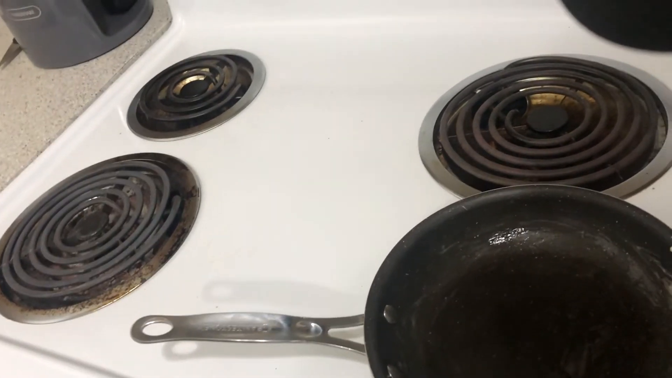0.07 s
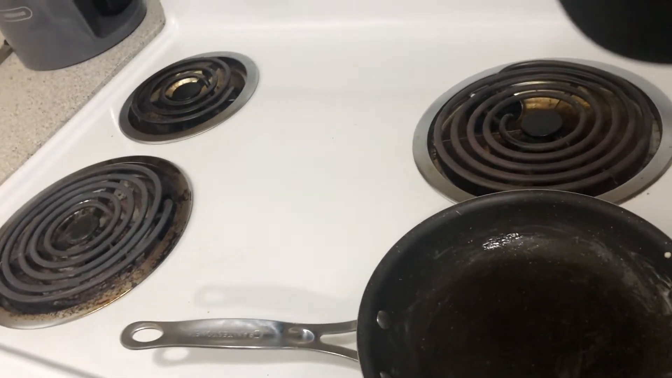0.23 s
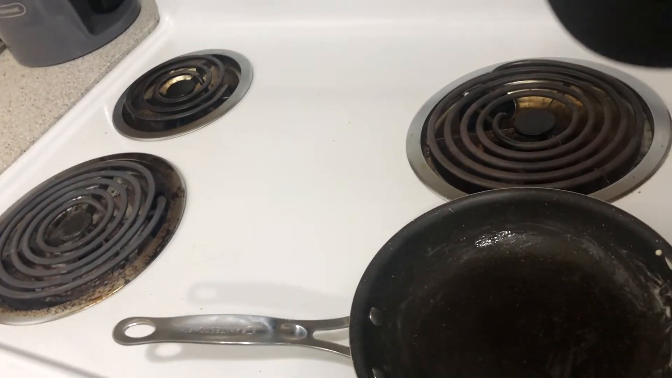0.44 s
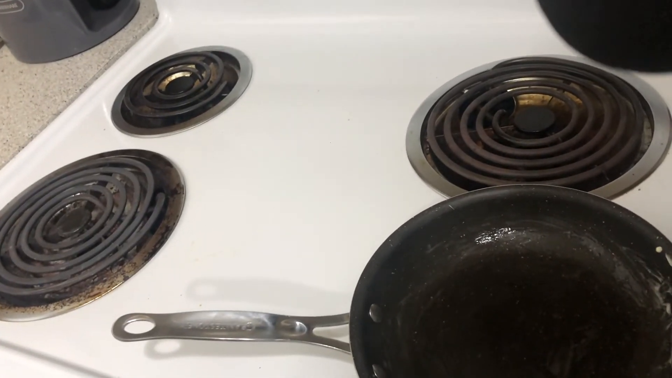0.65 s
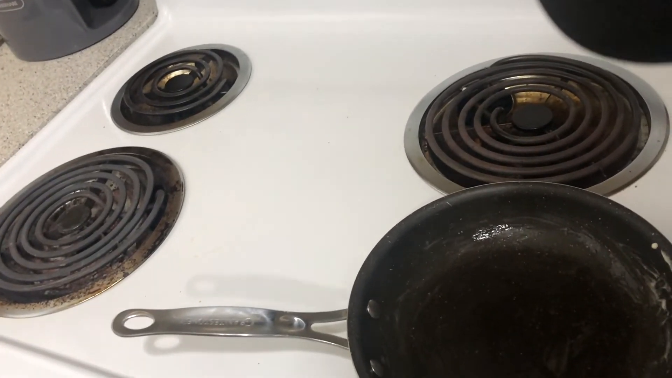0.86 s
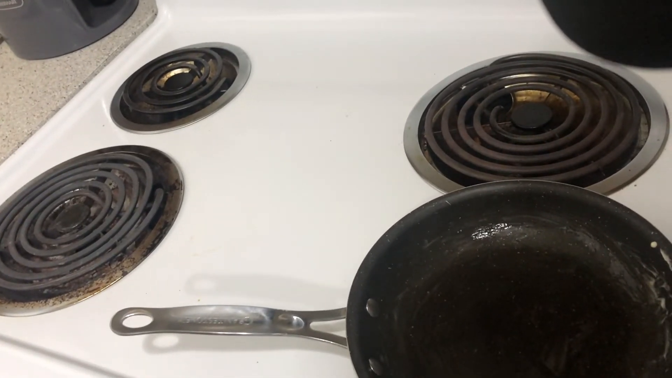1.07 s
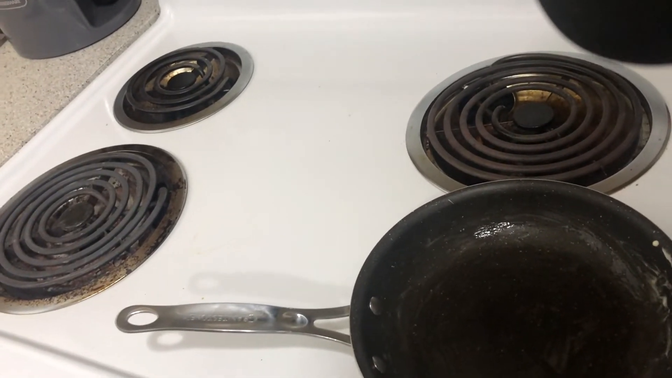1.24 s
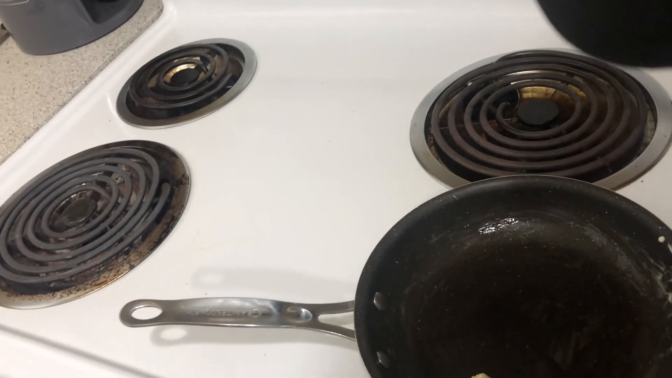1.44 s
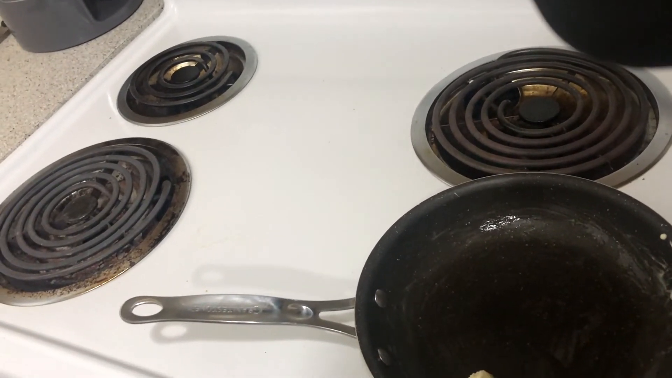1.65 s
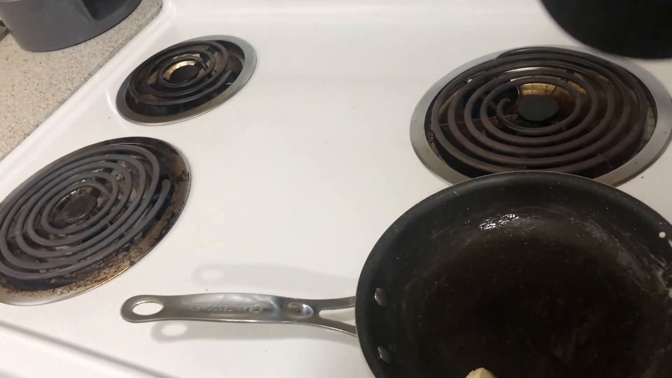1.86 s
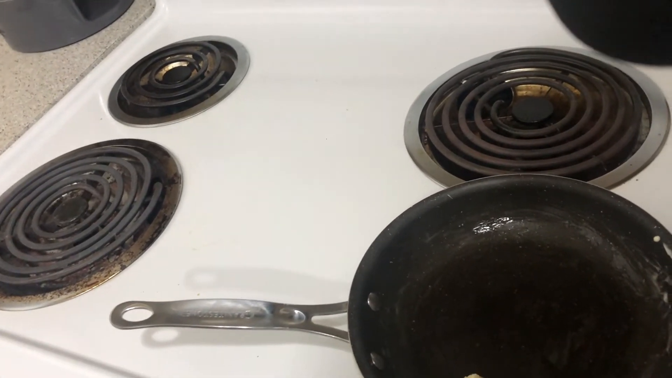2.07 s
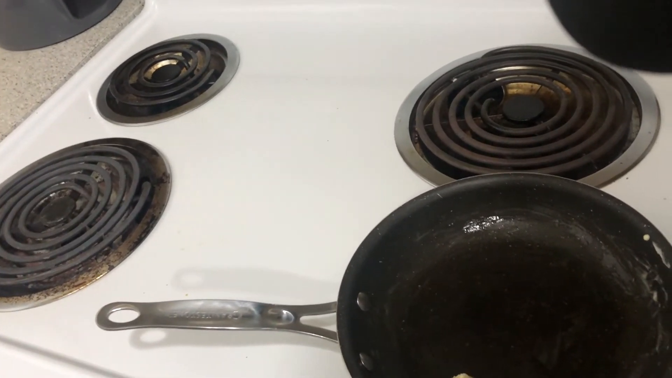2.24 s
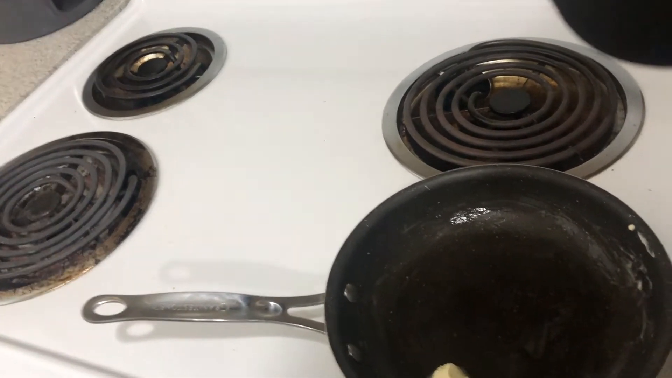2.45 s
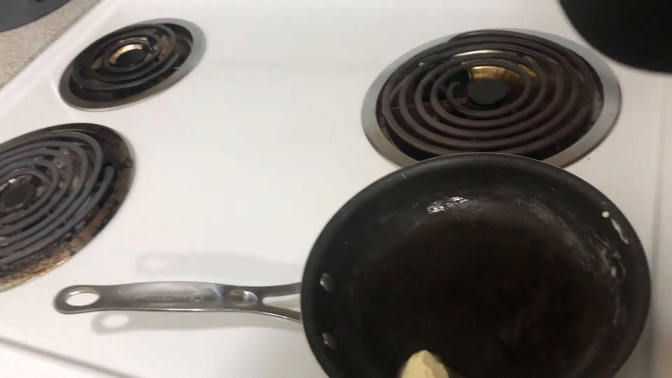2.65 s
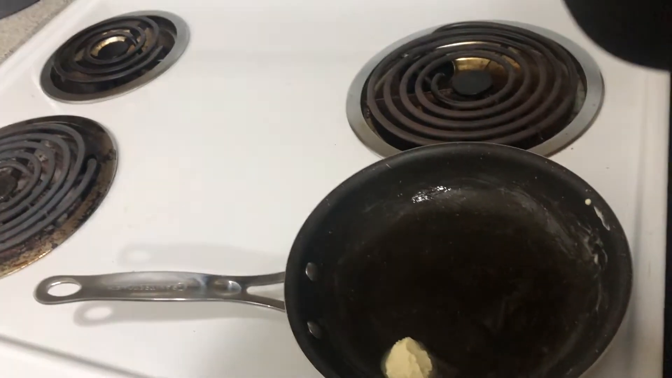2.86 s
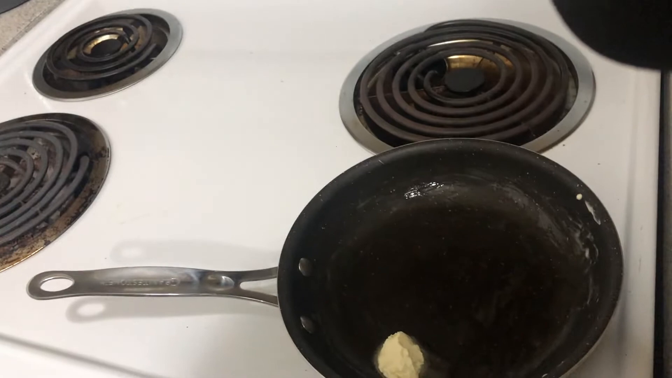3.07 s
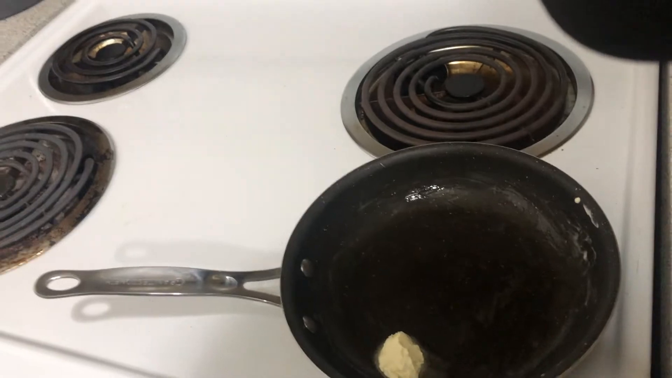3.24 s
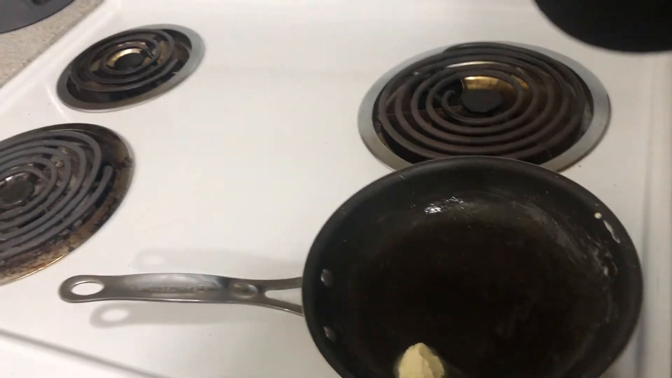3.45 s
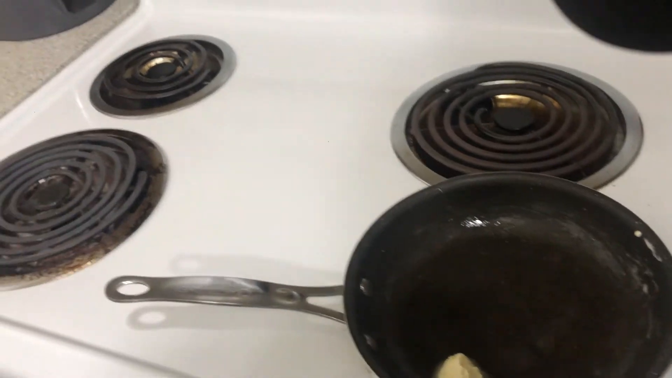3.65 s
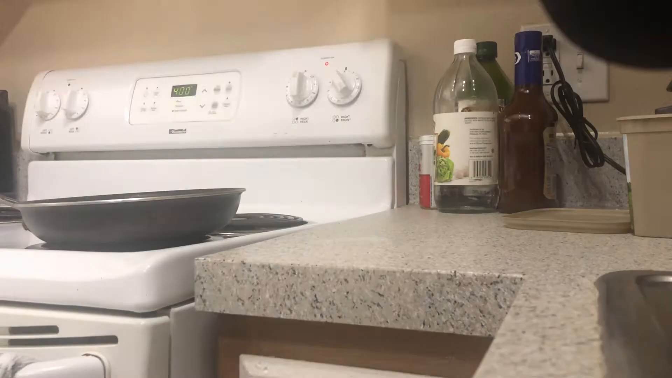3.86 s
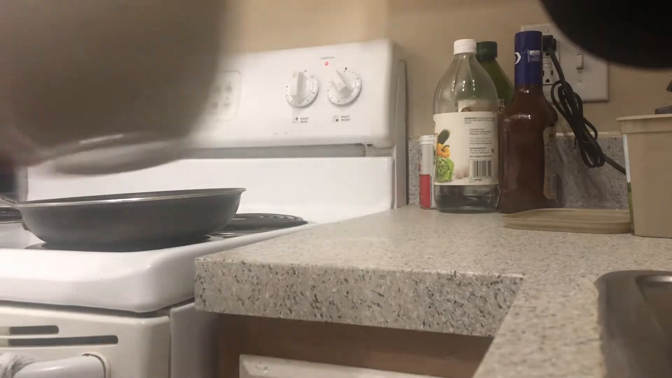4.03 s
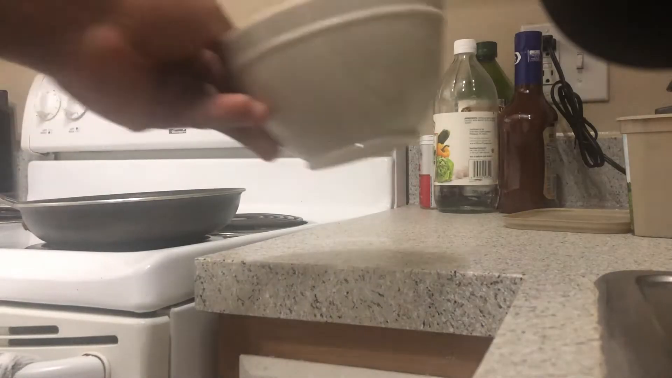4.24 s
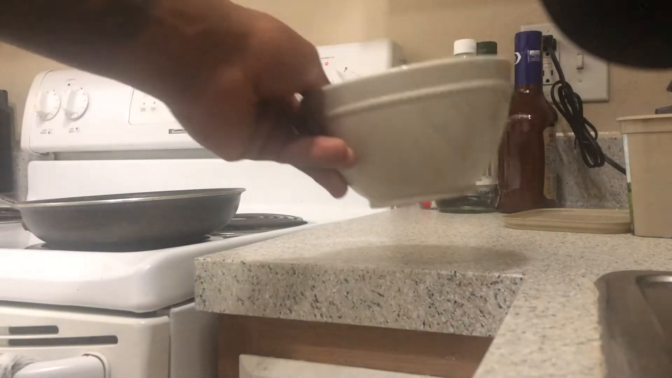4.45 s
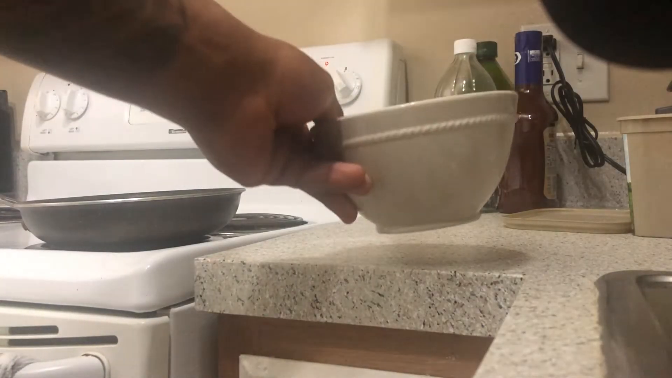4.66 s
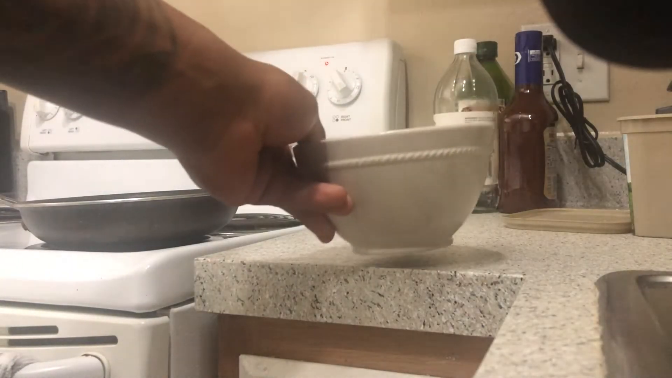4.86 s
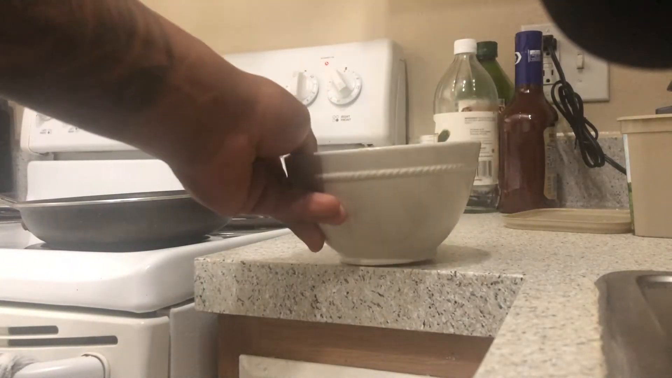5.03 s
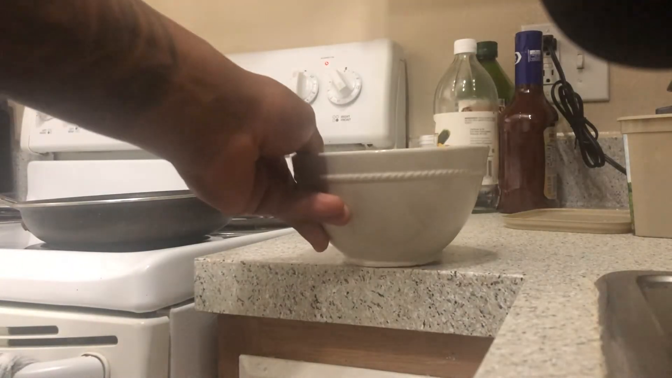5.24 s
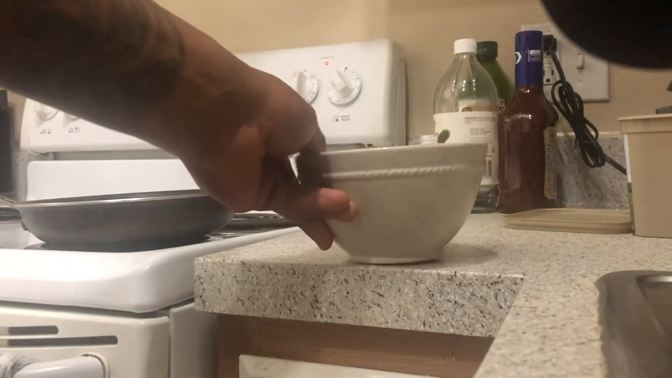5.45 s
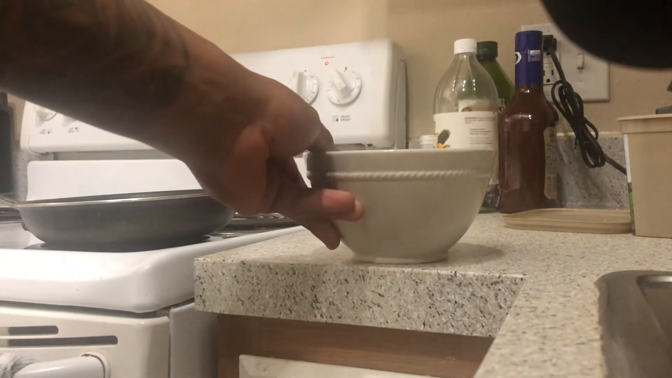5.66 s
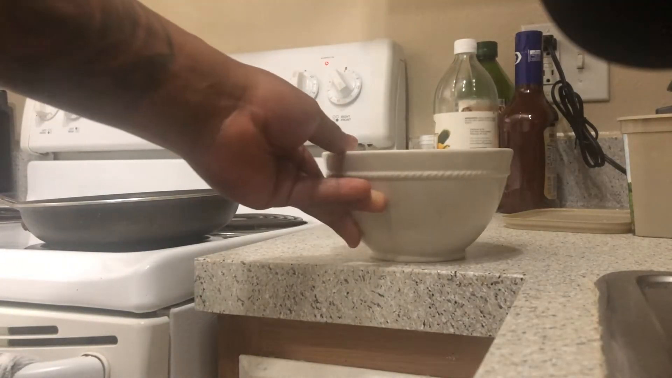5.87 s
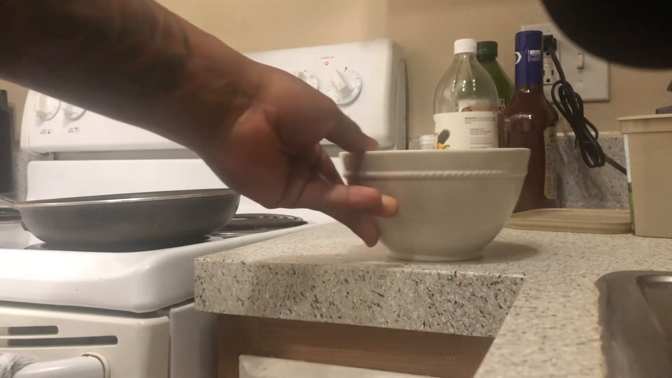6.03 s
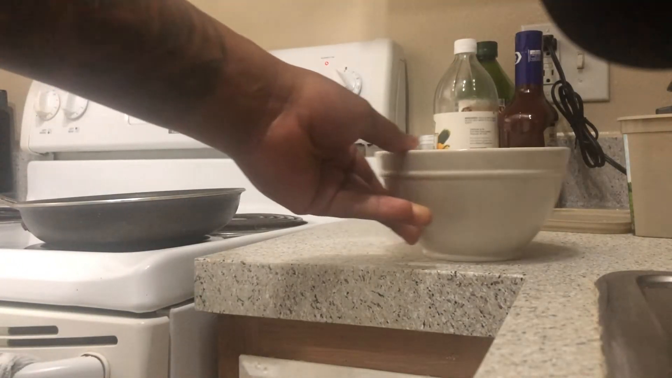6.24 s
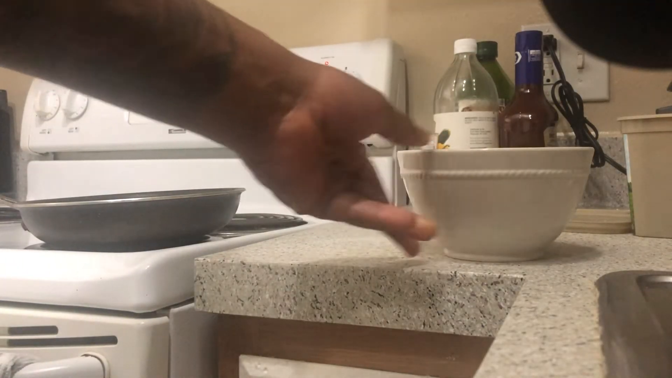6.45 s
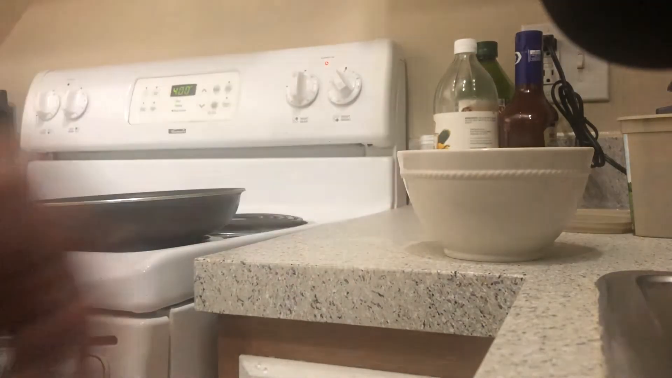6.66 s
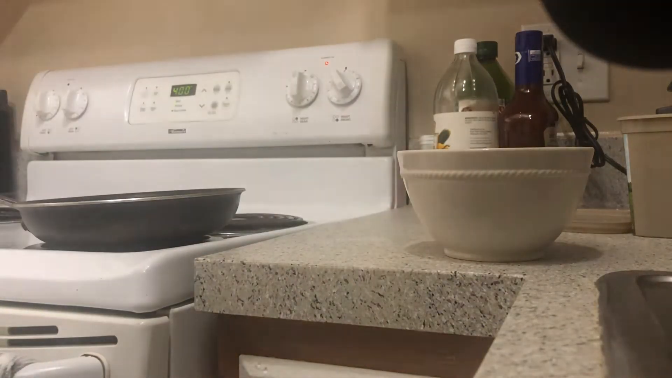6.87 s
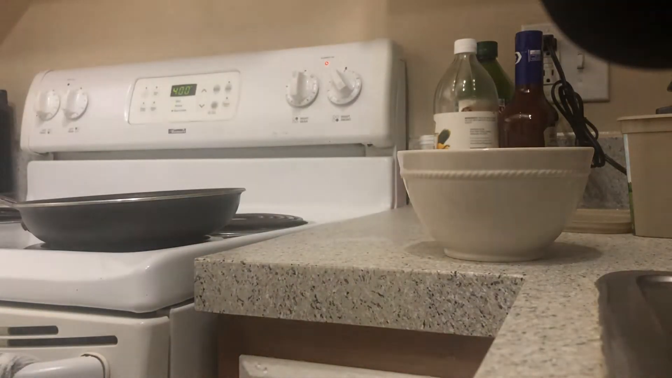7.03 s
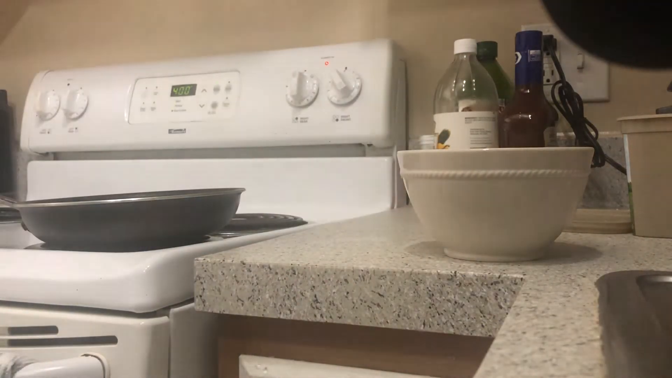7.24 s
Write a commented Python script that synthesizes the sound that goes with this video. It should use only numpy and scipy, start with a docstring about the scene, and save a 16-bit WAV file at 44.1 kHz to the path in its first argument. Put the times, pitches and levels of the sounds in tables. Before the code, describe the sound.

A knife knocks firmly five times on a frying pan, each hit a sharp tick with a short ring and a thud from the metal stove top. Lighter taps and a faint scrape on the rim follow, then soft brushing and a few bumps. A ceramic bowl touches the counter, clacks flat and is pushed along with a juddering scrape. The sounds are near the microphone in a small, quiet kitchen with a short echo.

```python
"""Five firm knife knocks on a frying pan, then light chatter and a wipe on its rim, as butter is knocked off.
Each blow ticks, rings pan and blade, and thuds in the electric stove's sheet-metal top.
A hand brushes and bumps about. A ceramic bowl meets the counter edge first, clacks flat
and is pushed along in stick-slip. A small, quiet kitchen echoes every knock."""
import sys
import numpy as np
from scipy import signal
from scipy.fft import rfft, irfft
from scipy.io import wavfile

SR = 44100
rng = np.random.default_rng(int(sys.argv[2]) if len(sys.argv) > 2 else 0)


def wav_out(sig):
    """Save sig, one row per channel (or a flat mono array), as 16-bit PCM at SR to the path in sys.argv[1]."""
    wavfile.write(sys.argv[1], SR, np.round(np.clip(np.atleast_2d(sig).T, -1, 1) * 32767).astype(np.int16))


N = 321930
NOW_S = np.arange(N) / SR
AGE_S = np.arange(SR) / SR   # time since a blow

# bowl and counter, coupled modes: (frequency [Hz], level [dB], t60 [s])
COUNTER_MODES = [(96, -43, 0.46), (126.4, -37.5, 0.26), (169.7, -39, 0.28), (208, -37, 0.069),
                 (261.4, -35, 0.29), (305, -51.5, .14), (406, -41, 0.15), (444.6, -20, .12),
                 (506.4, -25.5, 0.14), (537, -25, .14), (568.7, -22, 0.14), (614.2, -17.5, 0.11),
                 (625, -19, 0.12), (694, -24, 0.1), (805, -31.5, 0.088), (895, -25.5, 0.1235),
                 (930, -25.5, 0.076), (1019, -16, 0.12), (1068, -30, 0.07), (1100, -38, 0.065),
                 (1310, -48, 0.087), (1364, -28, 0.1), (1453, -36.5, 0.096), (1700, -43, .06),
                 (1940, -46.5, .06)]


def amp(db):
    """Decibels to gain."""
    return 10 ** (np.asarray(db) / 20)


def unit_rms(x):
    """Scale to unit power."""
    return x / np.sqrt(np.mean(x ** 2) + 1e-20)


def at_hz(points, hz):
    """Interpolate a table over log frequency."""
    points_hz, values = np.transpose(points)
    return np.interp(np.log(np.maximum(hz, 1)), np.log(points_hz), values)


def colour(x, spectrum):
    """Shape a steady sound's spectrum; unit power."""
    gain = amp(at_hz(spectrum, np.fft.rfftfreq(N, 1 / SR)))
    return unit_rms(irfft(rfft(x) * gain, N))


def butter(x, hz, kind):
    """Causal filter, second order per edge."""
    sos = signal.butter(2, np.clip(hz, 10, .48 * SR), kind, fs=SR, output="sos")
    return signal.sosfilt(sos, x + 1e-18)


def excite(x, response):
    """Drive a body or room with x."""
    return signal.fftconvolve(x, response)[:N]


def blows(times_s, db):
    """One impulse per blow."""
    out = np.zeros(N)
    out[np.round(np.asarray(times_s) * SR).astype(int)] = amp(db)
    return out


def crunch(times_s, db, t60_s):
    """Rough contacts: a fresh decaying noise per blow, unit energy at 0 dB."""
    out = np.zeros(N + SR)
    starts = np.round(np.asarray(times_s) * SR).astype(int)
    for start, gain, life_s in np.broadcast(starts, amp(db), t60_s):
        patter = rng.standard_normal(SR) * amp(-60 * AGE_S / life_s)
        out[start:start + SR] += gain * unit_rms(patter) / np.sqrt(SR)
    return out[:N]


def slips(per_s, spread_db):
    """Random stick-slip jerks of uneven size; unit power."""
    sizes = amp(spread_db * np.minimum(rng.exponential(1, N), 4)) * rng.choice([-1, 1], N)
    return unit_rms(sizes * (rng.random(N) < per_s / SR))


def stroke(start_s, end_s, rise_s, fall_s):
    """Movement envelope, 0 to 1: rise, hold, fall."""
    return np.clip(np.minimum((NOW_S - start_s) / rise_s, (end_s - NOW_S) / fall_s), 0, 1)


def modes(table, build_cycles):
    """Decaying sines of alternating sign, each with a gradual onset."""
    out = 0
    for k, (hz, db, t60_s) in enumerate(table):
        onset = 1 - np.exp(-(hz * AGE_S / build_cycles) ** 2)
        out += (-1) ** k * amp(db - 60 * AGE_S / t60_s) * np.sin(2 * np.pi * hz * AGE_S) * onset
    return out


def rubbed_modes(table, build_cycles):
    """Modes for a sustained drive: each has unit energy at 0 dB."""
    return sum(amp(db) * unit_rms(modes([(hz, 0, t60_s)], build_cycles))
               for hz, db, t60_s in table) / np.sqrt(SR)


def burst(spectrum, t60_s):
    """Crowded modes as decaying third-octave noises; t60_s is a time or a table."""
    out = 0
    edges_hz = 62.5 * 2 ** (np.arange(25) / 3)
    for low_hz, high_hz in zip(edges_hz, edges_hz[1:]):
        hz = np.sqrt(low_hz * high_hz)
        life_s = t60_s if np.isscalar(t60_s) else at_hz(t60_s, hz)
        band = butter(rng.standard_normal(SR) * amp(-60 * AGE_S / life_s), [low_hz, high_hz], "band")
        out += unit_rms(band) * amp(at_hz(spectrum, hz)) * np.sqrt(2 * (high_hz - low_hz)) / SR
    return out


def snap(spectrum):
    """Briefest causal pulse with this spectrum (minimum phase)."""
    gain = amp(at_hz(spectrum, np.fft.rfftfreq(SR, 1 / SR)))
    cepstrum = irfft(np.log(gain))
    cepstrum[1:SR // 2] *= 2
    cepstrum[SR // 2:] = 0
    return irfft(np.exp(rfft(cepstrum)))


def kitchen_air():
    """Faint steady noise of a still room."""
    # air spectrum: (frequency [Hz], density [dB])
    air_spectrum = [(15, -50.5), (25, -20), (59, -1), (123, -3.5), (190, -8.5), (229, -2.5), (263, -9),
                    (344, -6.5), (384, -12), (463, -10), (503, -14.5), (2610, -28), (9320, -30.5),
                    (14400, -37.5), (16000, -36)]
    return amp(-65) * colour(rng.standard_normal(N), air_spectrum)


def kitchen(x, first_wall_s, shift_hz, count=3):
    """Direct sound plus diffuse echo; hands and listener move, so echo patterns crossfade."""
    # echo spectrum: (frequency [Hz], density [dB])
    echo_spectrum = [(80, -11.5), (250, -2), (600, -9.5), (1300, -9), (4000, -11), (8000, -12),
                     (15000, -15.5)]
    # echo decay: (frequency [Hz], t60 [s])
    echo_decay = [(100, 0.49), (500, 0.48), (1500, 0.45), (4000, 0.45), (8000, 0.22), (15000, .2)]
    swell = 1 - np.exp(-(AGE_S / first_wall_s) ** 2)
    out = x
    for k in range(count):
        share = np.sqrt(2 / count) * np.cos(np.pi * (shift_hz * NOW_S + k / count))
        out = out + excite(x * share, burst(echo_spectrum, echo_decay) * swell)
    return out


def hiss_swells():
    """Soft swells of hiss: a short scrape after the first knife knock, and hands brushing surfaces."""
    # swells: (start [s], end [s], level [dB], low edge [Hz], high edge [Hz])
    swells = [(1.766, 1.96, -65.5, 1180, 6260), (1.952, 2.066, -61, 1100, 5000),
              (3.675, 3.844, -57.5, 3520, 11000), (3.902, 4.068, -60, 890, 4760),
              (6.75, 6.932, -71, 4960, 10550), (7.226, 7.36, -57, 2000, 9100)]
    out = 0
    for start_s, end_s, db, low_hz, high_hz in swells:
        hiss = unit_rms(butter(rng.standard_normal(N), [low_hz, high_hz], "band"))
        out += amp(db) * stroke(start_s, end_s, rise_s=0.062, fall_s=0.065) * hiss
    return out


def small_knocks():
    """Dull bumps and dry clicks of things being handled."""
    # knocks round the counter: (time [s], thump [dB], click [dB])
    knocks = [(4.1026, -6, -22.5), (4.251, -22, -5), (4.264, -24, -24), (4.284, -19, -31),
              (6.755, -41, -23.5), (6.911, -8.5, -13.5), (6.931, -15.5, -20)]
    # low thump: (frequency [Hz], density [dB])
    thump_spectrum = [(80, -35), (200, 9.5), (300, 0), (500, -1.5), (900, -29.5), (2000, -24), (5000, -68)]
    # dry click: (frequency [Hz], density [dB])
    click_spectrum = [(200, -8.5), (1000, -5), (2000, -12), (4000, -15.5), (7000, -17.5), (8500, -26),
                      (11000, -23), (16000, -54)]
    times_s, thump_db, click_db = np.transpose(knocks)
    thumps = excite(blows(times_s, thump_db), burst(thump_spectrum, t60_s=0.028))
    clicks = excite(blows(times_s, click_db), burst(click_spectrum, t60_s=0.16))
    return thumps + clicks


def bowl_let_go():
    """Freed from the damping hand, the wall rings on faintly."""
    # undamped bowl: (frequency [Hz], level [dB], t60 [s])
    free_modes = [(1276, -62.5, 1.4), (3110, -77.5, 0.5)]
    return excite(blows(times_s=[6.41], db=[0]), modes(free_modes, build_cycles=16))


def bowl_sliding():
    """The unglazed foot judders over the counter: the board rumbles, grit hisses, the wall sings."""
    # creep on edge, two nudges, long push: (start [s], end [s], initial speed [dB])
    pushes = [(5.1, 5.363, -45.5), (5.358, 5.621, -23), (5.696, 5.829, -2), (5.792, 5.967, -7.5),
              (5.958, 6.444, -5.5)]
    # board rumble: (frequency [Hz], density [dB])
    rumble_spectrum = [(60, -38), (95, -7), (150, -12.5), (220, -2), (320, -1.5), (460, -1), (620, -14),
                       (740, -9.5), (1030, -12.5), (1200, -16.5), (1420, -17.5), (2000, -23), (2600, -36),
                       (4000, -49)]
    # grit hiss: (frequency [Hz], density [dB])
    grit_spectrum = [(900, -22.5), (1800, 8), (2500, 2.5), (4000, 0), (6000, -2.5), (9000, -18.5),
                     (15000, -30)]
    # glazed wall: (frequency [Hz], level [dB], t60 [s])
    wall_modes = [(3113, -7, .7), (10255, -16.5, 0.32), (12200, -24.5, 0.22), (12215, -16.5, .3),
                  (14481, -17.5, .2)]
    speed_up_db_per_s = 24
    catch_db, catch_hz = 1.5, 25   # speed jitter as the foot catches and frees itself
    speed = 0
    for start_s, end_s, db in pushes:
        elapsed_s = np.clip(NOW_S, start_s, end_s) - start_s
        envelope = stroke(start_s, end_s, rise_s=0.046, fall_s=0.098) ** 2
        speed += envelope * amp(db + speed_up_db_per_s * elapsed_s)
    speed *= amp(catch_db * unit_rms(butter(rng.standard_normal(N), catch_hz, "low")))
    board_drive = amp(-43) * speed ** 0.52
    wall_drive = amp(-67.5) * speed ** .55
    board = butter(modes(COUNTER_MODES, build_cycles=1.6), 506.5, "low")
    board = unit_rms(butter(board, 220, "high")) / np.sqrt(SR)
    wall = rubbed_modes(wall_modes, build_cycles=0.86)
    judder = amp(-1) * excite(slips(per_s=1100, spread_db=3.5) * board_drive, board)
    rumble = amp(-3.5) * board_drive * colour(slips(per_s=1600, spread_db=2), rumble_spectrum)
    grit = amp(-65) * speed * colour(slips(per_s=5600, spread_db=1), grit_spectrum)
    singing = excite(slips(per_s=6100, spread_db=4) * wall_drive, wall)
    return judder + rumble + grit + singing


def bowl_landing():
    """The edge touches down softly, the bowl rolls, then the whole foot drops with a hard clack."""
    # contacts, softer with lower cutoff: (time [s], level [dB], cutoff [Hz])
    landings = [(5.067, -20.5, 355), (5.0748, -1.5, 334), (5.0788, -24.5, 7080), (5.34, -17.5, 188),
                (5.436, -32.5, 420), (5.522, -30, 2400), (5.5281, -1, 2690)]
    # foot clack: (frequency [Hz], density [dB])
    clack_spectrum = [(30, -34), (100, -10.5), (250, 2.5), (600, 22.5), (900, 19), (1300, 7.5), (1700, 7.5),
                      (2100, 1.5), (2800, -8), (4000, -7), (6000, -7.5), (10000, 0.5), (15000, -18)]
    sharp_db = -27.5   # unfiltered share of each contact
    clack = amp(-0.5) * snap(clack_spectrum) + amp(1.5) * burst(clack_spectrum, t60_s=0.1)
    force = sum(butter(blows([time_s], [db]), cutoff_hz, "low") + blows([time_s], [db + sharp_db])
                for time_s, db, cutoff_hz in landings)
    return excite(force, modes(COUNTER_MODES, build_cycles=1.6) + clack)


def knife_wiping():
    """Amid the light taps the blade grates along the rim and its thin steel sings."""
    # scraped blade: (frequency [Hz], level [dB], t60 [s])
    blade_modes = [(1390, -1.5, .02), (2170, -5, .015), (2650, 0, .025), (3380, -3.5, .03),
                   (3580, -3, .015), (4660, -3, 0.0092), (5350, -6, 0.0087)]
    wipe = stroke(start_s=3.38, end_s=3.58, rise_s=.05, fall_s=0.038)
    friction = slips(per_s=810, spread_db=5) * wipe
    return amp(-69) * excite(friction, rubbed_modes(blade_modes, build_cycles=0.79))


def sheet_thud(start_hz, end_hz, sink_s, swell_s, width_s, db):
    """Slow, long bending waves arrive last, so a metal sheet's thud sinks in pitch."""
    hz = end_hz + (start_hz - end_hz) * np.exp(-AGE_S / sink_s)
    swell = np.exp(-(np.log((AGE_S + 1e-6) / swell_s) * swell_s / width_s) ** 2)
    return amp(db) * swell * np.sin(2 * np.pi * np.cumsum(hz) / SR)


def knife_on_pan():
    """Steel ticks on the rim, pan and knife ring, and the sheet-metal stove top thuds after them."""
    # five firm knocks, then chatter: (time [s], force [dB], pan ring [dB], steel tick [dB])
    taps = [(1.913, -6.5, -4.5, -2), (2.233, -3, -10, -2.5), (2.447, 0, -2, 1.5), (2.6795, -1, -2.5, 1),
            (2.897, -2, -3, -3), (3.2656, -20, -18.5, -11), (3.3712, -33, -28, -21),
            (3.423, -35, -27.5, -16), (3.472, -32, -33, -34)]
    # stove top: (frequency [Hz], level [dB], t60 [s])
    stove_modes = [(74.7, -29, 0.14), (112.4, -54, 0.52), (245.4, -29, 0.076), (257, -63, 0.56),
                   (349.6, -21, 0.026), (452, -37.5, 0.059)]
    # frying pan: (frequency [Hz], level [dB], t60 [s])
    pan_modes = [(683, -46, 0.074), (1110, -34, 0.012), (1090, -30, 0.05), (1330, -21.5, 0.044),
                 (1410, -27.5, 0.068), (1467, -26, 0.059), (1625, -30.5, .035), (1770, -46, 0.015),
                 (2028, -32, 0.067), (2187, -39, 0.04), (2380, -34, 0.043), (2642, -34, 0.038),
                 (3160, -42, .03), (3450, -42.5, 0.058), (3640, -32, 0.033), (3950, -39, 0.11),
                 (4240, -38, 0.027), (4830, -46, 0.034), (5960, -28, 0.016), (5960, -48, 0.03),
                 (7550, -36, 0.022), (8250, -44, .02)]
    # blade and handle: (frequency [Hz], level [dB], t60 [s])
    knife_modes = [(251.4, -39.5, 0.1), (335, -41, 0.078), (483, -53, 0.042), (641, -41, 0.039),
                   (1005, -36, 0.038), (1123, -43, 0.071), (1475, -48, 0.12), (2725, -50, 0.058),
                   (3190, -52, 0.047), (4340, -54, 0.027), (5230, -55, 0.023)]
    # steel tick: (frequency [Hz], density [dB])
    tick_spectrum = [(500, -36), (1000, -26), (1400, -9.5), (2000, -10.5), (3000, -2.5), (5000, 1.5),
                     (6800, -7), (8000, -4), (10000, -11.5), (13000, -19), (16000, -38)]
    # pan's crowded weak modes: (frequency [Hz], density [dB])
    clatter_spectrum = [(40, -22), (250, 4), (750, -9), (1050, 12.5), (1400, -1.5), (1650, 3.5),
                        (2100, 3.5), (2900, -6.5), (4200, -1.5), (7000, -9.5), (8200, -14.5),
                        (11000, -16.5), (16000, -53)]
    times_s, force_db, ring_db, tick_db = np.transpose(taps)
    # a firm hit clicks cleanly; a light one glances, grates longer and lands late
    skid_share = .22
    grating_t60_s = .0034 * amp(-0.77 * force_db)
    lands_s = times_s + skid_share * (grating_t60_s - grating_t60_s.min())

    stove = modes(stove_modes, build_cycles=2.02)
    stove += sheet_thud(start_hz=236.5, end_hz=97.8, sink_s=0.012, swell_s=.022, width_s=.012, db=-30.5)
    thud = excite(blows(lands_s, force_db), stove)
    ring = excite(blows(lands_s, ring_db), modes(pan_modes, build_cycles=1.6))
    knife_db = np.minimum(ring_db + 21.5, 0)   # capped by the grip
    knife = excite(blows(lands_s, knife_db), modes(knife_modes, build_cycles=2.16))

    click = blows(times_s, tick_db - 2 + .25 * force_db)
    grating_db = np.minimum(tick_db - 1.5, -9.5)   # capped: a firm hit bites
    tick = excite(click + crunch(times_s, grating_db, grating_t60_s), snap(tick_spectrum))

    clatter_head = crunch(times_s, (tick_db + ring_db) / 2 + 0.2, t60_s=0.073)
    clatter_tail = crunch(times_s, ring_db - 3, t60_s=0.2)
    clatter = excite(clatter_head + clatter_tail, snap(clatter_spectrum))
    return thud + ring + knife + tick + clatter


def scene():
    """All sources in one room, over its steady air; mono."""
    bowl = bowl_landing() + bowl_sliding() + bowl_let_go()
    sources = knife_on_pan() + knife_wiping() + bowl + small_knocks() + hiss_swells()
    return (kitchen_air() + kitchen(sources, first_wall_s=0.014, shift_hz=1.7))[None]


def record(dry):
    """Steep low-pass."""
    cutoff_hz = 15600
    return signal.sosfilt(signal.ellip(10, .1, 80, cutoff_hz, fs=SR, output="sos"), dry)


dry = scene()
out = record(dry)
wav_out(out)
```